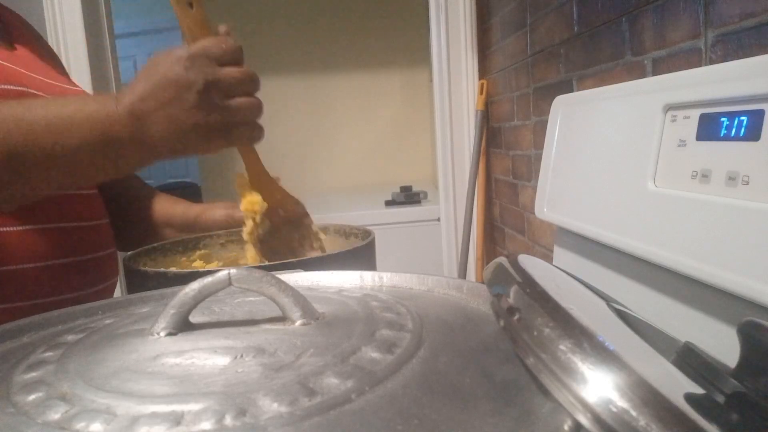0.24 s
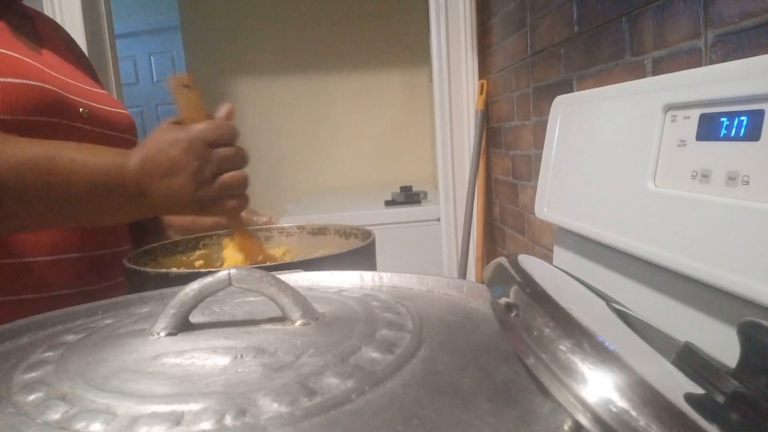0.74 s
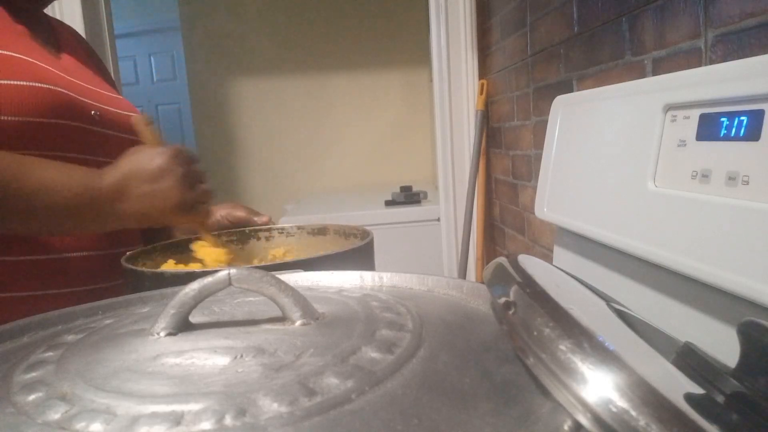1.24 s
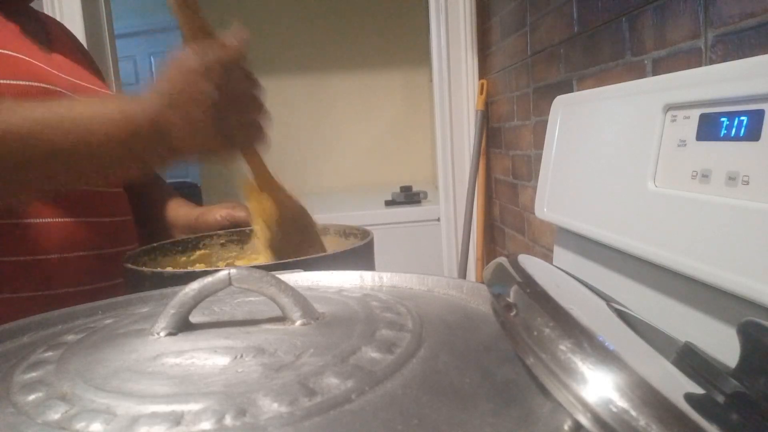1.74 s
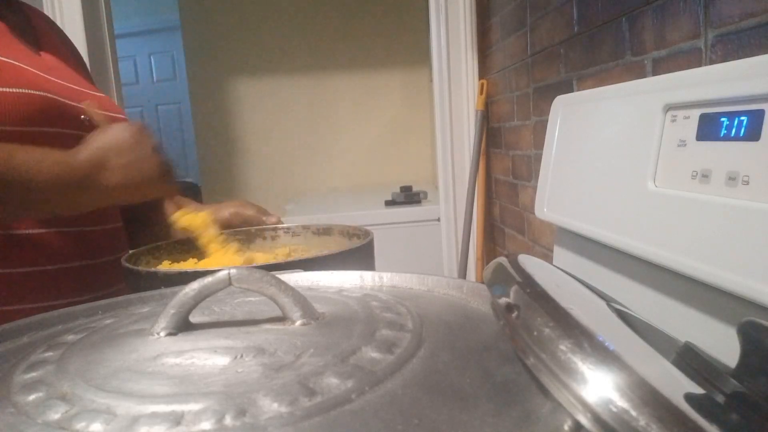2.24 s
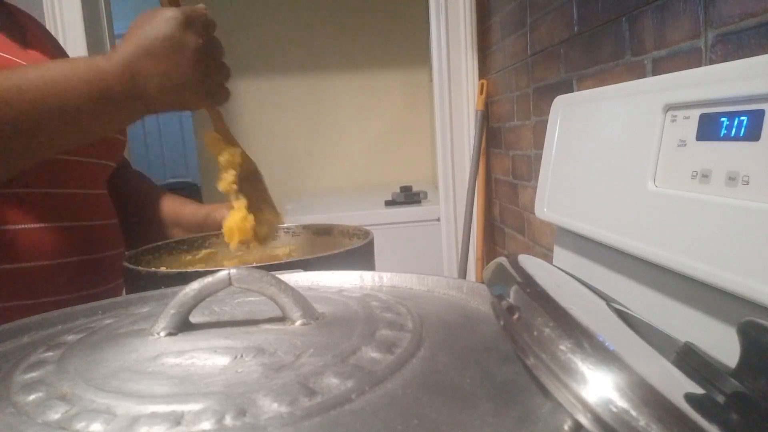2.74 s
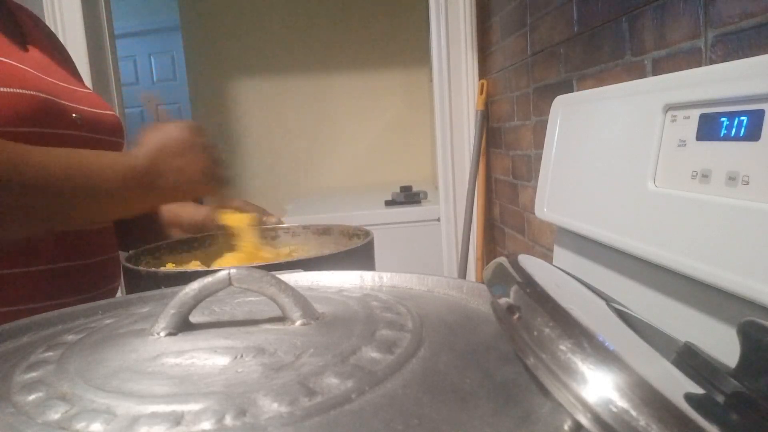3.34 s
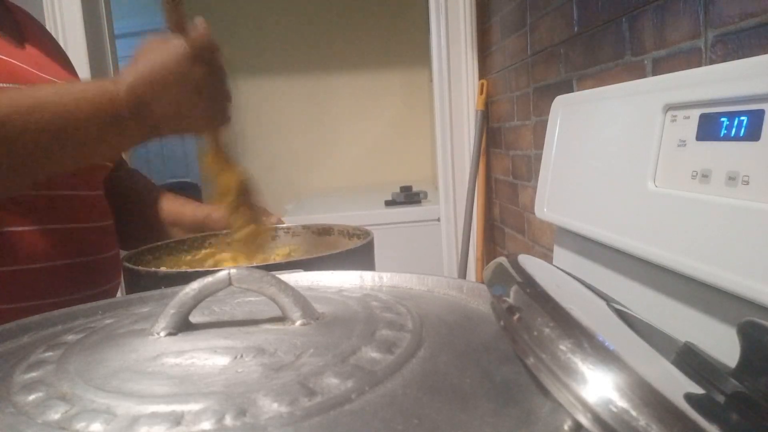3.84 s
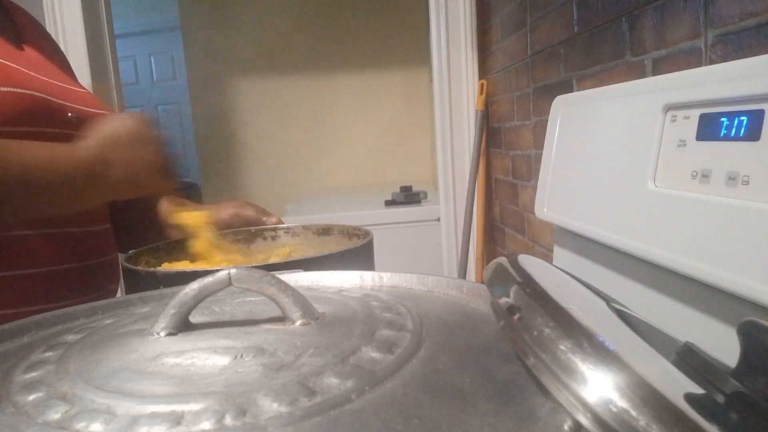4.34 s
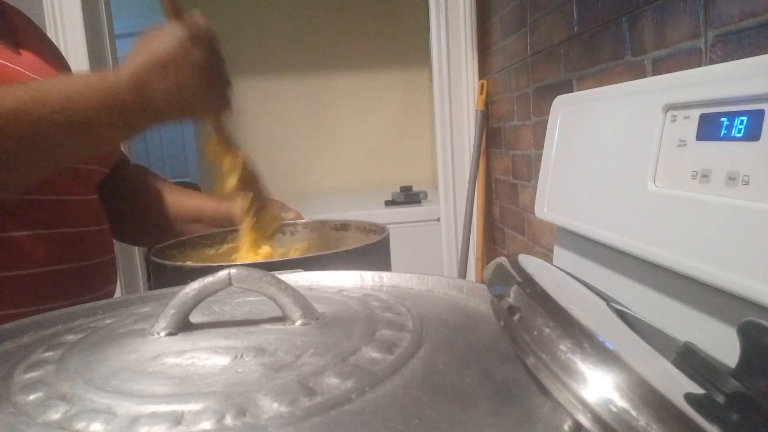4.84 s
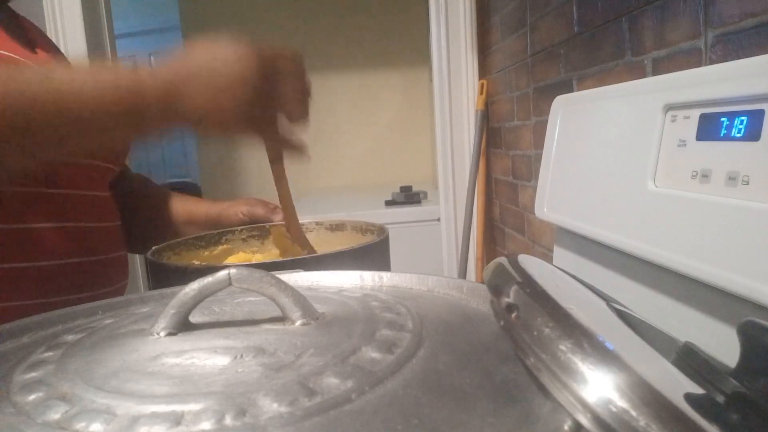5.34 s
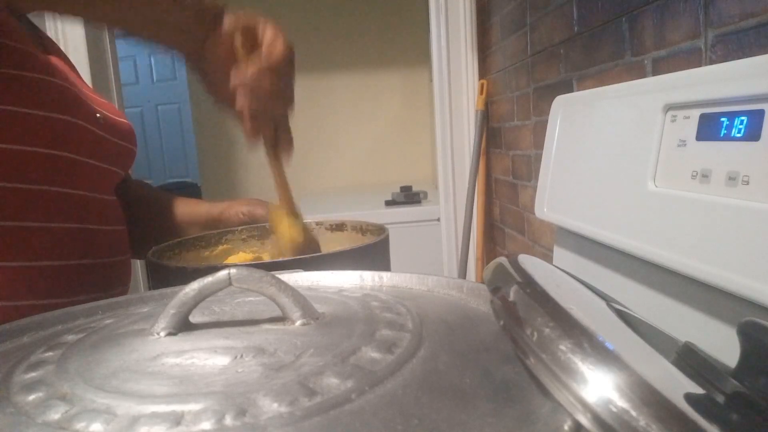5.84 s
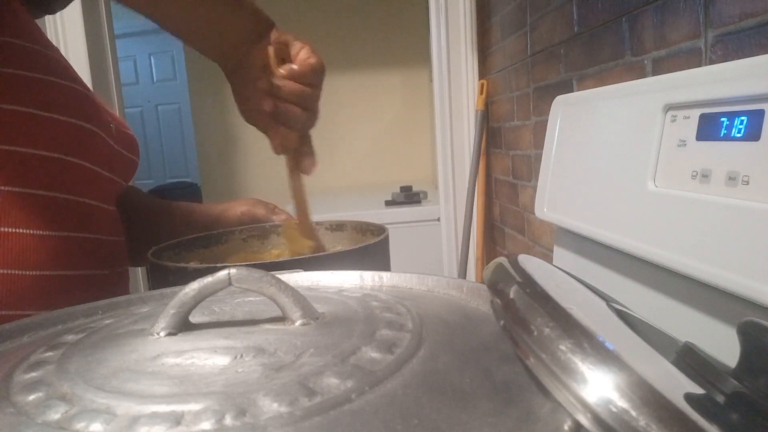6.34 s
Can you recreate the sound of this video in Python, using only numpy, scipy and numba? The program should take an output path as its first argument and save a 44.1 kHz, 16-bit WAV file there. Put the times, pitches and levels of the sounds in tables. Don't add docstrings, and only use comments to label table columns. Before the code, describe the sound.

A wooden spoon drags and thumps through thick cornmeal in a metal pot, with dull knocks, wet squeaks and a faint appliance hum.

```python
import sys
import numpy as np
from scipy import signal
from scipy.fft import rfft, irfft
from scipy.io import wavfile
from scipy.ndimage import uniform_filter1d
from numba import njit

SR = 44100
rng = np.random.default_rng(int(sys.argv[2]) if len(sys.argv) > 2 else 0)


def generate_wav(signal):
    frames = np.transpose(np.atleast_2d(signal))
    scaled = np.clip(frames, -1, 1) * 32767
    pcm = np.round(scaled).astype(np.int16)
    wavfile.write(sys.argv[1], SR, pcm)


def gain_from_db(level_db):
    decades = np.asarray(level_db, float) / 20
    return 10 ** decades


N = 290178
T = np.arange(N) / SR
HZ = np.fft.rfftfreq(N, 1 / SR)

# pitch in Hz, level in dB.
HUM = [(118.4, -65), (188.4, -63), (258.4, -75.5), (376.8, -69.5), (473.7, -72), (532.9, -71.5),
       (769.8, -72), (947.5, -93), (1007, -82), (1244, -82)]
# frequency in Hz, level in dB.
ROOM_NOISE = [(18, -51), (30, -21), (184, -1), (311, -8), (374, -6), (540, -13), (666, -12), (760, -22),
              (1010, -25), (1100, -32.5), (1220, -32), (1540, -36.5), (5170, -37.5), (6550, -27.5),
              (16000, -40)]
# frequency in Hz, time to fall 60 dB in seconds.
ROOM_T60 = [(60, 0.51), (400, 0.39), (2000, 0.34), (6000, 0.38), (14000, 0.38)]

# time of most force in seconds, build-up in seconds,
# let-go in seconds, push on the stove in dB, drag on the pot in dB.
LEANS = [(0.03, .1, 0.076, -71, -61), (0.23, 0.038, 0.47, -52.5, -61), (0.44, 0.018, 0.093, -45, -50.5),
         (0.82, 0.73, 0.36, -47.5, -57.5), (1.25, 0.12, 0.28, -48.5, -59.5), (1.44, 0.16, 0.23, -47, -51),
         (1.7, .08, 0.26, -60, -79), (2.12, 0.38, 0.27, -52, -53.5), (2.48, 0.16, 0.039, -47.5, -61),
         (2.64, 0.18, 0.25, -43.5, -54), (3.0, 0.12, 0.98, -54, -68.5), (3.47, 0.26, 1, -53, -65),
         (3.77, 0.06, 0.29, -50, -54), (4.18, 0.06, 0.3, -66, -63), (4.39, 0.22, 0.32, -49.5, -61.5),
         (4.62, 0.019, 0.18, -56, -42), (4.81, 0.13, 0.084, -43.5, -40), (5.18, 0.21, 0.051, -46.5, -52),
         (5.28, .07, 0.099, -43, -51.5), (5.76, 0.15, 0.085, -64.5, -62), (5.87, 0.068, 0.2, -62, -49),
         (6.27, 0.36, 0.31, -49, -62), (6.57, 0.25, .1, -50.5, -66)]
# time of most speed in seconds, build-up in seconds,
# let-go in seconds, grit in dB, peeling mush in dB.
STROKES = [(0.0, .05, 0.095, -72, -63), (0.225, 0.062, 0.4, -65.5, -62), (0.46, 0.071, 0.4, -65, -69),
           (.62, 0.2, .25, -65, -67), (0.86, 0.4, 0.16, -56, -62.5), (0.95, 0.19, 0.13, -83, -63.5),
           (1.11, 0.035, 0.31, -76, -64), (1.485, 0.047, 0.14, -62, -57.5), (2.12, 0.15, 0.64, -79.5, -66),
           (2.375, 0.063, 0.073, -82, -61.5), (2.65, 0.083, 0.21, -71, -61), (2.76, 0.15, 0.1, -78, -61),
           (3.45, 0.4, 0.52, -77.5, -68.5), (3.81, 0.032, 0.065, -70, -64), (3.93, 0.16, 0.062, -64, -56.5),
           (4.2, 0.15, .14, -93, -71), (4.33, 0.25, 0.25, -81, -66.5), (4.69, 0.072, 0.12, -64, -56),
           (4.81, 0.11, 0.09, -53, -54.5), (5.06, 0.11, 0.5, -77, -60.5), (5.23, 0.031, 0.16, -66, -63.5),
           (5.4, 0.18, 0.46, -79.5, -64.5), (5.86, 0.039, 0.12, -70.5, -64),
           (5.93, 0.099, 0.14, -79, -64.5), (6.28, 0.26, 0.76, -75.5, -63.5), (6.56, 0.32, .1, -82, -72)]
REST_DB = [-76, -67, -100, -84]
# centre in Hz, width in Hz, level in dB.
SCRAPE = [(1992, 90, 11), (2200, 110, 9.5), (2500, 250, 1.5), (3100, 300, -1.5), (3500, 490, -1.5),
          (2780, 4500, -2)]
# frequency in Hz, level in dB.
HISS = [(1470, -36.5), (2500, -3.5), (2810, -23), (3210, -13), (3980, -1.5), (4370, 1), (5440, 3),
        (5970, -3.5), (12500, -0.5), (16000, -8.5)]

# start in seconds, level in dB.
SHOVES = [(0.329, -69), (0.5, -67), (0.868, -59), (1.459, -52), (1.919, -58), (2.019, -57), (2.23, -58),
          (2.68, -45), (3.206, -61), (3.75, -53), (4.195, -45), (4.25, -59), (4.64, -50), (4.729, -49.5),
          (4.857, -42), (4.868, -33), (5.248, -68)]
# start in seconds, pot bottom in dB,
# then stove top, pot body and wall in dB relative to the bottom.
KNOCKS = [(1.8912, -27, -20, -3, -4), (1.907, -23, -6, -4.5, -7.5), (1.93, -34, 4.5, 5, -2),
          (3.193, -27.5, -4, -8, 0.5), (3.209, -27, -10, 1.5, -10), (3.23, -31, -1.5, 1, -2),
          (3.284, -35, -6, -2, -3), (3.342, -42, 5.5, 1, -3.5), (4.617, -31.5, -4.5, 1.5, -41),
          (4.632, -29.5, -2.5, -6, -32), (4.702, -37.5, 0, -2, -9), (4.722, -28, 1, -8.5, -31),
          (4.657, -41.5, -8, -3.5, -11.5), (4.759, -41, -4.5, 8, -8), (4.78, -41.5, -4, -1, -5),
          (4.8355, -17.5, -12.5, 3, 1.5), (4.84, -26, -4, 4, -11), (4.856, -25, -7, -20, -9),
          (4.873, -29, -3, 6, -8), (4.909, -42.5, 5, 11.5, -24)]
# start in seconds, pot bottom in dB,
# then pot body and wall in dB relative to the bottom.
BUMPS = [(0.427, -41, -15, -17), (0.633, -47, -1, -24), (0.785, -54, 1, 3), (0.851, -40.5, -5.5, -26),
         (0.933, -59.5, 15, 2), (1.363, -44, -21, -17.5), (1.425, -41, -3, -12), (1.476, -55, -4, 0),
         (2.19, -41, -4, -25), (2.509, -38.5, -3, -22), (2.519, -38.5, -1.5, -39), (2.611, -47.5, 10, -13),
         (2.632, -47, -17, -5), (2.661, -47.5, 6, -5), (2.693, -47, -5, -9.5), (2.759, -55, 3, -1.5),
         (2.816, -47.5, -3, -13), (3.944, -54, 9, -2), (4.149, -45, -10, -30), (4.194, -40, 2, -20),
         (5.176, -46, -11, -33), (5.215, -42, -20, -10), (5.222, -49, 9, -16), (5.261, -56, 13.5, 5.5),
         (5.874, -46.5, -7, -1.5), (5.94, -56, 6, -17), (5.968, -49, -1, -2), (6.247, -48.5, -2, -21.5)]

# pitch in Hz, level in dB,
# time to fall 60 dB in seconds.
FRAME = [(71.2, 1, 0.27), (82.7, -26, 0.39)]
STOVE = [(115.2, 0.5, 0.28), (155, -12, 0.1), (180, -4.5, 0.18), (220.1, -3, 0.13), (287, -3.5, 0.14)]
BOTTOM = [(330.5, -2, 0.15), (367, -8, 0.057), (409.8, 4, 0.074), (472, -1, 0.09)]
BODY = [(505.5, -1.5, 0.092), (549.6, 0.5, 0.088), (600, -6.5, 0.095), (669, -4, 0.043), (755, -1.5, 0.049),
        (846, -4.5, 0.073), (1017, -4, 0.019)]
WALL = [(1170, 0, 0.05), (1200, -4, 0.039), (1320, 9.5, 0.026), (1468, 0.5, 0.062), (1547, 2, 0.05),
        (1840, 5.5, 0.012), (2037, -0.5, 0.027), (2400, -34, 0.039), (2820, -20, 0.02)]
RIM = [(3290, -3, 0.036), (3560, 2, 0.022), (4180, 3.5, 0.025), (4640, -27, 0.043), (5800, -2, 0.052),
       (7300, 3.5, 0.018)]

# frequency in Hz, level in dB.
THUD = [(100, -36), (250, -3.5), (420, 3), (560, 1), (900, -8), (1800, -60.5)]
CLATTER = [(500, -46.5), (1100, 3.5), (1600, -0.5), (2100, -3.5), (2800, -8), (4000, -15), (8000, -56)]
CRACK = [(800, -13), (1500, -0.5), (3000, 2.5), (6000, -0.5), (8000, -15), (14000, -45.5)]
SNAP = [(5000, -28), (7500, -0.5), (12500, 0.5), (15000, -11), (16000, -33)]

# start in seconds, level in dB, pitch in Hz.
TAPS = [(0.185, -58, 2580), (0.2175, -58, 2160), (0.427, -49, 1210), (.426, -51, 2200), (0.785, -44, 1400),
        (.785, -55, 2200), (0.924, -49, 1340), (1.366, -45, 1110), (1.4248, -42, 900), (2.509, -44, 1010),
        (2.61, -42, 600), (4.153, -44, 650), (6.247, -45, 660), (2.6316, -39, 1504), (2.6579, -38.5, 1530),
        (2.6942, -44, 1150), (2.7563, -48, 1340), (2.809, -46, 1195), (3.946, -43.5, 1184),
        (4.194, -48, 1580), (5.211, -33.5, 1549), (5.2622, -30, 1560), (5.871, -38, 1147),
        (5.9437, -43, 1200), (5.97, -37, 1210)]
# start in seconds, level in dB, pitch in Hz.
TICKS = [(5.221, -41.5, 7300), (0.9445, -50, 5200), (.9445, -49, 8460), (.9445, -49, 12000),
         (1.104, -48, 8000), (1.104, -51, 12000), (1.344, -53, 8000), (1.4745, -36, 6460),
         (1.4738, -36, 3330), (1.4745, -49, 10600), (2.377, -46, 12700), (3.8063, -47, 11900),
         (5.221, -39, 12900), (5.8446, -50, 4500), (5.8447, -42, 8600), (5.8445, -51, 11350),
         (5.872, -45, 3500)]
# middle in seconds, pitch in Hz, length in seconds, level in dB, glide in Hz per second.
SQUEAKS = [(.222, 2520, 0.033, -66, 300), (.222, 2200, 0.028, -66, 300), (0.433, 5500, .015, -69, 303),
           (0.66, 3290, .04, -70.5, 300), (0.857, 3750, 0.03, -69, 300), (.86, 3100, .04, -67, 300),
           (5.055, 12300, .015, -70, 300), (5.095, 12500, 0.032, -66, 300), (5.088, 11500, 0.029, -66, 303),
           (5.12, 10500, .02, -71, -30000), (5.126, 9650, 0.034, -70, -3000), (5.12, 4440, 0.01, -68, 300),
           (5.175, 4430, 0.034, -72, 299), (5.188, 8500, .02, -72, 3000), (5.25, 12300, 0.04, -65, -4000),
           (5.35, 6700, 0.014, -72, 300), (5.387, 12050, 0.035, -64, -500), (5.4, 10400, .012, -74, 300),
           (5.418, 4170, 0.03, -65, -500), (5.429, 5080, 0.028, -61, 8000), (5.445, 4100, 0.027, -67, -500),
           (5.455, 4680, 0.027, -61, 500), (5.474, 4000, 0.027, -59, 500), (5.498, 4140, .014, -57.5, 300),
           (5.524, 4050, 0.045, -72, 298.5), (6.53, 10540, 0.076, -74, 300)]
# start in seconds, pitch in Hz, level in dB,
# time to fall 60 dB in seconds.
BOOMS = [(.3, 119, -56, .8), (.7, 119, -45, .8), (.854, 119, -46, .4), (1.29, 118, -47, .6),
         (2.42, 119, -53, .5), (2.526, 118, -46, .4), (2.647, 118, -45, .5), (2.92, 118, -51, .9),
         (3.0, 118, -49, .8), (3.24, 116, -40, .4), (3.37, 115, -43, .6), (3.737, 118, -51, .6),
         (4.291, 118, -48, .8), (4.633, 118, -41, .3), (4.725, 112, -30, .25), (4.73, 150, -33, .25),
         (4.845, 112, -23.5, .3), (4.86, 150, -29, .2), (4.93, 120, -33, .4), (.3, 68, -58, .4),
         (5.212, 70, -51, .3), (2.64, 62, -47, .25), (4.44, 70, -56, .3), (4.78, 60, -45, .3),
         (1.996, 80, -43, .3), (5.264, 118, -42, .7), (.56, 188, -54, .8), (.8, 188, -54, 1.1),
         (3.225, 283, -33, .2), (3.23, 215, -33, .2), (6.0, 190, -56, 1.2), (6.38, 190, -53, 1.2)]
# start in seconds, pitch in Hz,
# level in dB, time to fall 60 dB in seconds.
RINGS = [(1.907, 410, -22.5, 0.11), (1.911, 221, -31, .2), (1.906, 335, -31.5, 0.12),
         (1.905, 1600, -31, 0.032), (1.93, 1550, -29, 0.053), (2.005, 118, -36.5, 0.26),
         (2.051, 116, -39.5, 0.15), (2.509, 485, -37, .1), (3.21, 430, -31.5, 0.14),
         (3.235, 1550, -30, 0.15), (3.23, 2060, -33, .15), (3.284, 2000, -40, 0.042),
         (3.341, 1520, -42, 0.05), (3.343, 1120, -43, .05), (4.619, 450, -29.5, 0.13),
         (4.622, 770, -39, 0.11), (4.722, 316, -32, 0.14), (4.73, 430, -37.5, 0.13),
         (4.837, 1330, -20, 0.04), (4.843, 410, -16, .14), (4.8552, 416, -15.5, .1),
         (4.8455, 535, -16, .08), (4.853, 575, -15, .07), (4.8365, 5500, -27, .03),
         (4.872, 800, -21.5, .04), (4.619, 540, -31, 0.098), (2.7, 500, -38.5, 0.085),
         (2.693, 1340, -37, .07), (2.694, 530, -38, .1), (2.53, 470, -38, .1), (2.662, 180, -38, .08),
         (4.632, 440, -31, .07), (.851, 420, -44, .1), (1.38, 1200, -50, .05), (1.892, 2750, -36, .03),
         (1.918, 1200, -34, .04), (.634, 520, -45, .12), (1.432, 430, -42, 0.06), (4.915, 460, -25, .09),
         (3.211, 500, -24, .06), (3.222, 420, -22, .05), (3.262, 400, -30, .09), (1.556, 1800, -62, .12),
         (.868, 500, -46, .06), (5.87, 1490, -44, 0.041), (4.85, 220, -26.5, .3), (4.852, 67, -25.5, 0.21),
         (4.855, 865, -16.5, 0.07), (4.893, 380, -29, 0.13)]


def unit(x):
    return x / np.sqrt(np.mean(x ** 2))


def on_log(hz, table):
    f, v = np.transpose(table)
    return np.interp(np.log(hz + 1), np.log(f), v)


def tilt(left_db):
    return gain_from_db(np.array([[left_db], [-left_db]]))


def pair(alike_hz, shape):
    mid, side = rng.standard_normal((2, len(HZ))) + 1j * rng.standard_normal((2, len(HZ)))
    share = HZ ** 2 / (HZ ** 2 + alike_hz ** 2)
    both = np.array([mid + share * side, mid - share * side])
    return irfft(shape * both / np.sqrt(1 + share ** 2), N)


def walk(rate):
    k = int(SR / rate)
    steps = np.repeat(rng.standard_normal(N // k + 1), k)
    return unit(uniform_filter1d(uniform_filter1d(steps, k), k)[:N])


def kitchen():
    hum = 0
    clock = T + np.cumsum(0.00363 * walk(9.8)) / SR
    for hz, db in HUM:
        hum = hum + gain_from_db(db + 0.5 + 2.3 * walk(14)) * np.sin(2 * np.pi * hz * clock)
    noise_db = -64.5 + 1.2 * walk(4.22)
    return hum + gain_from_db(noise_db) * unit(pair(489.0, gain_from_db(on_log(HZ, ROOM_NOISE))))


def swells(table):
    edge_db, roundness = -19, 1.195
    power = 0
    for s, rise, fall, *db in table:
        away = np.where(T < s, (s - T) / rise, (T - s) / fall)
        level_db = np.array(db)[:, None] + edge_db * np.minimum(away, 8) ** roundness
        power = power + gain_from_db(2 * level_db)
    return power


def scrape(gain):
    shape = sum(gain_from_db(db) / (1 + ((HZ - hz) / (width / 2)) ** 4) for hz, width, db in SCRAPE)
    grains = gain_from_db(0.87 * walk(360) + 1.6 * walk(30))
    return gain * unit(pair(1100.0, shape) * grains)


def hiss(gain):
    puffs = gain_from_db(1.23 * walk(310) + 0.96 * walk(17))
    return gain * unit(pair(1200., gain_from_db(on_log(HZ, HISS))) * puffs)


@njit
def resonate(force, pole, turn, out):
    z, both = 0j, out.copy()
    for i in range(len(force)):
        z = z * pole + force[i]
        both[0, i] += z.imag
        both[1, i] += (z * turn).imag
    return both


def ring(modes, hits, drag, scatter_db, apart_hz, left_db):
    out = np.zeros((2, N))
    rub = rng.standard_normal(N)
    spot = rng.standard_normal((len(hits), len(modes)))
    for k, (hz, db, t60) in enumerate(modes):
        pole = np.exp(2j * np.pi * hz / SR - np.log(1000) / (t60 * SR))
        own_rub = np.roll(rub, k * SR // 10)
        force = drag * own_rub * np.sqrt(1 - abs(pole) ** 2)
        for (start, burst), s in zip(hits, spot[:, k]):
            force[start:start + len(burst)] += burst * gain_from_db(scatter_db * s) * (-1) ** k
        turn = np.exp(1j * np.pi * (-1) ** k * min(hz / apart_hz, .75) ** 2)
        out = resonate(gain_from_db(db) * force, pole, turn, out)
    return out * tilt(left_db / 2)


def blows(s, db, push_ms, rattle_ms):
    t = np.arange(1500) / SR
    rattle = rng.standard_normal((len(s), len(t))) ** 3 * np.exp(-t * 1000 / rattle_ms)
    rattle *= 0.66 / np.sqrt(np.sum(rattle ** 2, axis=1, keepdims=True))
    rattle[:, 0] = 0.85
    push = np.hanning(3 + int(push_ms * SR / 1000))
    push /= push.sum()
    return [(int(a * SR), gain_from_db(d) * np.convolve(r, push)) for a, d, r in zip(s, db, rattle)]


def spray(hits, decay_ms, table, left_db):
    clicks = np.zeros(N)
    for start, burst in hits:
        clicks[start:start + len(burst)] += np.abs(burst)
    fade = signal.lfilter([1], [1, -np.exp(-1000 / (decay_ms * SR))], clicks)
    return fade * tilt(left_db / 2) * unit(pair(1000., gain_from_db(on_log(HZ, table))))


def contacts():
    s, db, body, wall = np.transpose(BUMPS)
    boom = -4 - 0.11 * (db + 43)
    bumps = np.transpose([s, db, boom, body, wall])
    rows = np.concatenate([KNOCKS, bumps])
    s, db, boom, body, wall = rows[np.argsort(rows[:, 0])].T
    first = np.diff(s, prepend=0) > .07
    crack = 1.2 * wall - 9 - 0.5 * first
    return s, db, boom, body, wall, crack


def stove(push):
    s, db, boom, *_ = contacts()
    shove_s, shove_db = np.transpose(SHOVES)
    frame = ring(FRAME, blows(shove_s, shove_db - 1.0, 1.4, 13.0), push * gain_from_db(-24.0), 1.5, 720.0, 2.7)
    top = ring(STOVE, blows(s, db + boom - 5.5, 2.1, 7.9), push * gain_from_db(-9.0), 3.1, 420.0, 5.2)
    return frame + top


def pot(drag):
    s, db, _, body, wall, crack = contacts()
    out = ring(BOTTOM, blows(s, db - 5.5, 1.01, 5.1), drag * gain_from_db(-7.0), 2.42, 880.0, 1.1)
    out += ring(BODY, blows(s, db + body - 7.0, 0.69, 25.0), drag * gain_from_db(-8.0), 2.95, 1130.0, 0.87)
    out += ring(WALL, blows(s, db + wall - 8.0, 0.17, 6.6), drag * gain_from_db(-27.0), 2.4, 1500., 3.5)
    out += ring(RIM, blows(s, db + crack - 6.5, .03, 2.3), 0, 4.0, 1500., 0.99)
    return out


def wood_on_metal():
    s, db, _, body, wall, crack = contacts()
    out = spray(blows(s, db + body / 2 - 16.5, 1.26, 8.0), 12.3, THUD, 1.8)
    out += spray(blows(s, db + wall - 17.5, 0.37, 12.3), 15.0, CLATTER, 4.6)
    out += spray(blows(s, db + crack - 8.5, .03, 1.9), 10.8, CRACK, 1.2)
    out += spray(blows(s, 1.363 * (db + crack), .03, 5.2), 3.5, SNAP, -.3)
    return out


def taps():
    tap_t60, tick_t60 = 0.054, 0.0091
    out, t = np.zeros((2, N)), np.arange(4000) / SR
    ratios, size = np.array([[1], [.88], [1.33]]), gain_from_db(np.array([[0], [-4], [-8]]))
    table = [(*row, tap_t60) for row in TAPS] + [(*row, tick_t60) for row in TICKS]
    turns = rng.uniform(0, 2 * np.pi, (len(table), 3, 1))
    for (s, db, hz, t60), turn in zip(table, turns):
        angle = 2 * np.pi * np.minimum(hz * ratios, 15000) * t
        left = (size * np.sin(angle)).sum(axis=0)
        right = (size * np.sin(angle + 0.71 * (turn - np.pi))).sum(axis=0)
        start = int(s * SR)
        out[:, start:start + len(t)] += gain_from_db(db - 8.5 - 58 * t / t60) * np.array([1.27 * left, right])
    return out


def squeaks():
    out = np.zeros(N)
    clock = T + np.cumsum(.004 * walk(190)) / SR
    flutter = gain_from_db(4.0 * walk(160))
    for s, hz, length, db, glide in SQUEAKS:
        near = slice(int((s - .1) * SR), int((s + .1) * SR))
        t = T[near] - s
        swell = np.exp(-(t / (length / 2)) ** 2)
        out[near] += gain_from_db(db) * swell * np.sin(2 * np.pi * (hz * clock[near] + glide * t ** 2 / 2))
    return out * flutter


def rings():
    out, t = np.zeros((2, N + SR)), T[:SR // 2]
    for s, hz, db, t60 in RINGS + BOOMS:
        shape = (1 - np.exp(-t * hz / .7)) * gain_from_db(db - 60 * t / t60)
        lag = min(hz / 560, 1) ** 2 * np.array([[.5], [-.5]])
        start = int(s * SR)
        out[:, start:start + len(t)] += shape * np.sin(2 * np.pi * hz * t + lag * np.minimum(t * hz, 1))
    return out[:, :N] * tilt(0.8)


def room(x, wet_db, left_db):
    size = 2 ** 15
    t, f = np.arange(size) / SR, np.fft.rfftfreq(size, 1 / SR)
    noise, tail = rfft(pair(365.0, 1)[:, :size]), 0
    for hz in 50 * 2 ** np.arange(0, 8.6, .5):
        band = irfft(noise * np.exp(-(np.log2((f + 1) / hz) / .35) ** 2), size)
        tail = tail + band * gain_from_db(-60 * t / on_log(hz, ROOM_T60))
    tail = tail * (1 - np.exp(-t / 0.0037)) / np.sqrt(np.sum(tail ** 2) / 2)
    echo = signal.oaconvolve(x.mean(axis=0)[None], tail, axes=1)[:, :N]
    return x + gain_from_db(wet_db) * tilt(left_db) * echo


def scene():
    moves = np.concatenate([swells(LEANS), swells(STROKES)])
    moves = moves + gain_from_db(2 * np.array(REST_DB))[:, None]
    push, drag, grit, steam = np.sqrt(moves)
    shake = gain_from_db(1.9 * walk(40))
    struck = stove(push * shake) + pot(drag * shake) + wood_on_metal()
    tones = rings()
    room_share = .55
    out = room(struck, -1.22, 0.6)
    out = out + room(taps() + room_share * tones, -7.5, .8) + (1 - room_share) * tones
    return out + scrape(grit) + hiss(steam) + squeaks() + kitchen() * tilt(1.1)


def low_pass(x):
    return signal.sosfilt(signal.butter(12, 16510, fs=SR, output="sos"), x)


def record(dry):
    dry = signal.sosfilt(signal.butter(5, 56, "high", fs=SR, output="sos"), dry)
    dry = signal.sosfilt(signal.ellip(8, .3, 60, 15750, fs=SR, output="sos"), dry)
    return low_pass(dry)


dry = scene()
out = record(dry)
generate_wav(out)
```